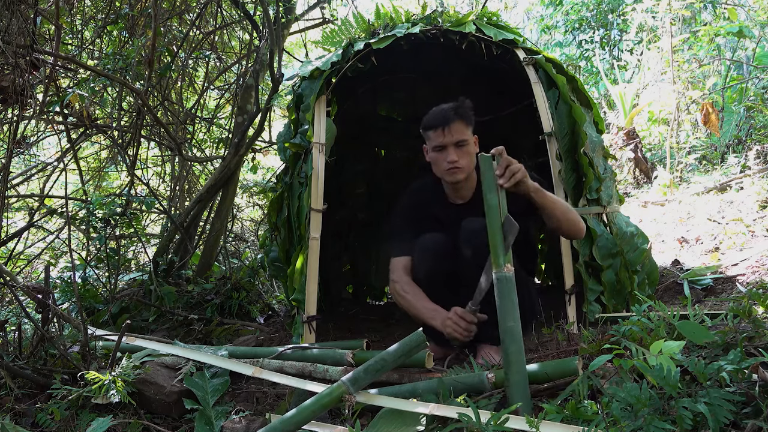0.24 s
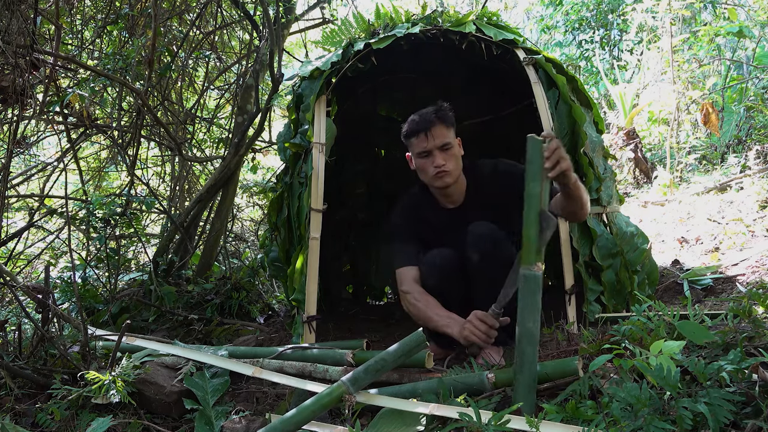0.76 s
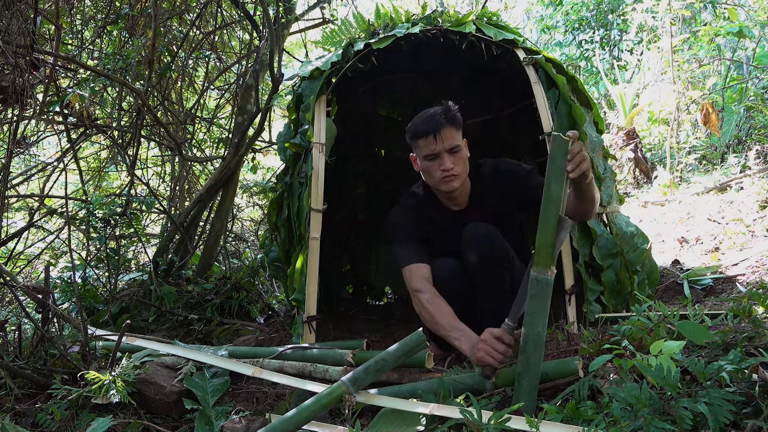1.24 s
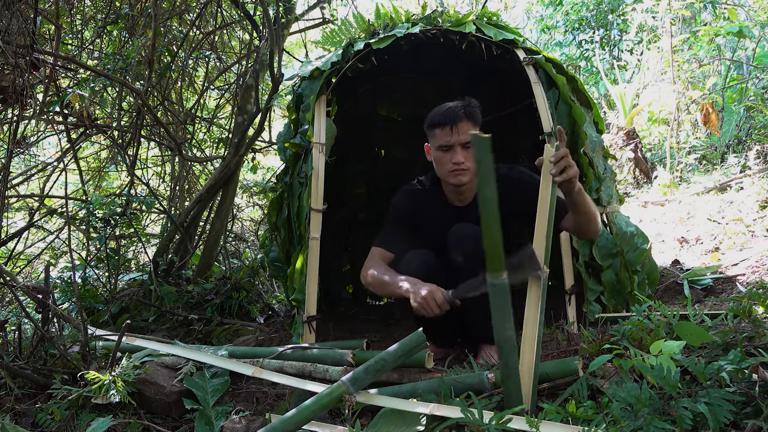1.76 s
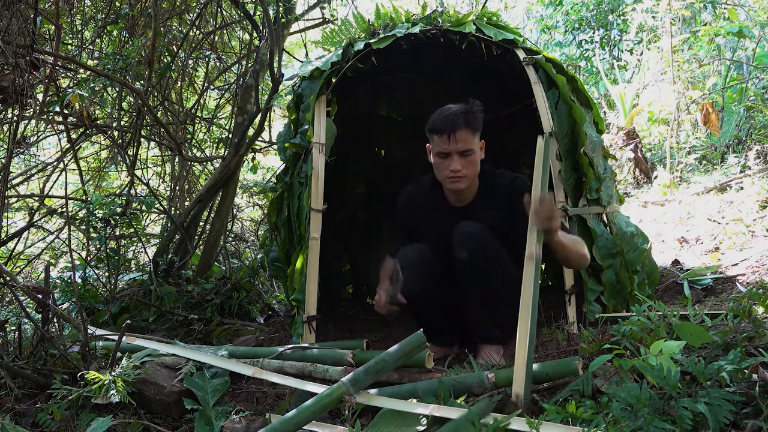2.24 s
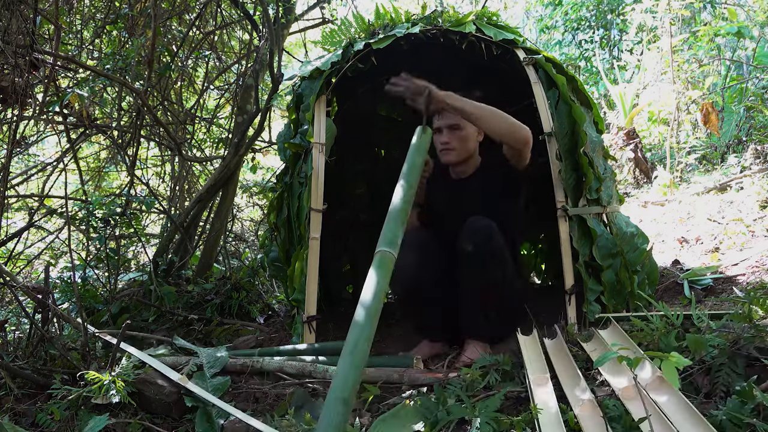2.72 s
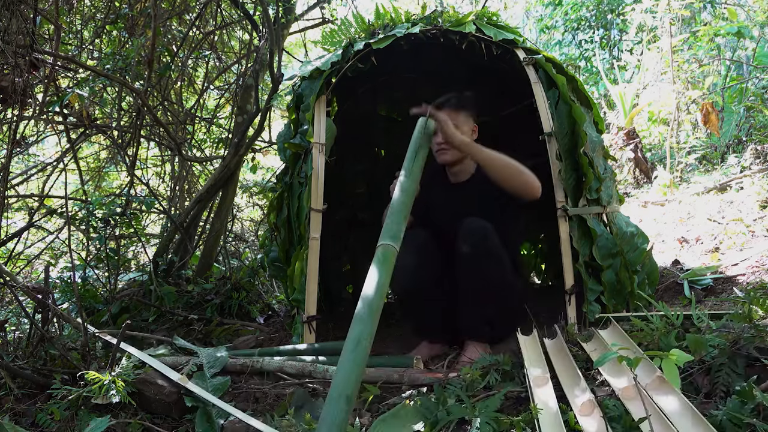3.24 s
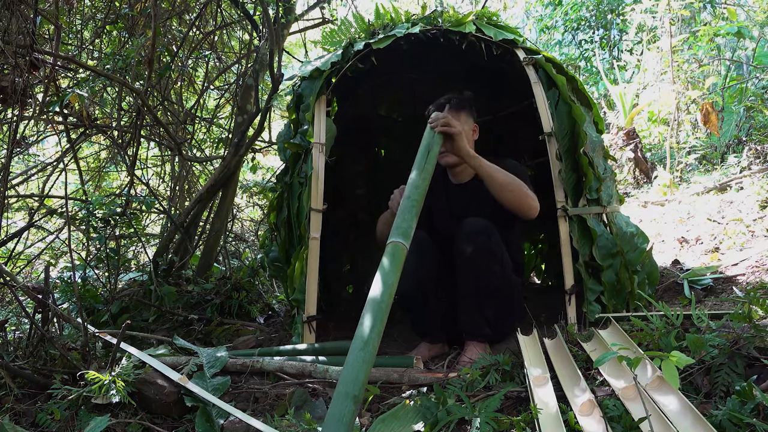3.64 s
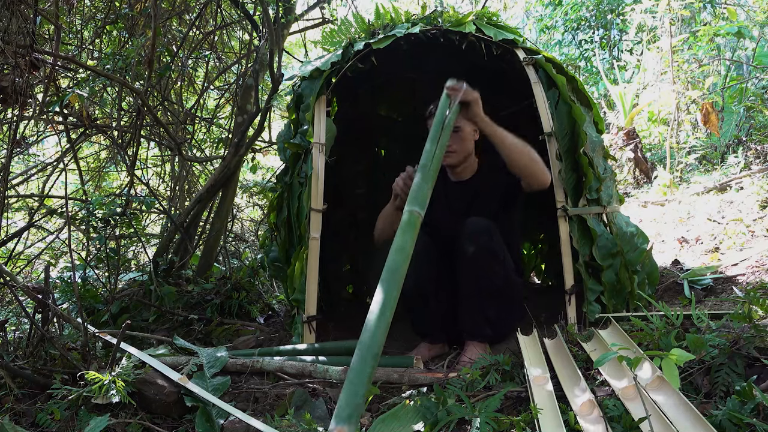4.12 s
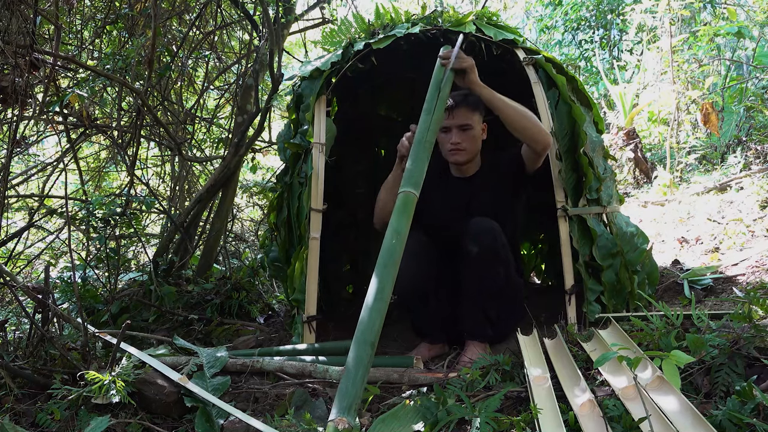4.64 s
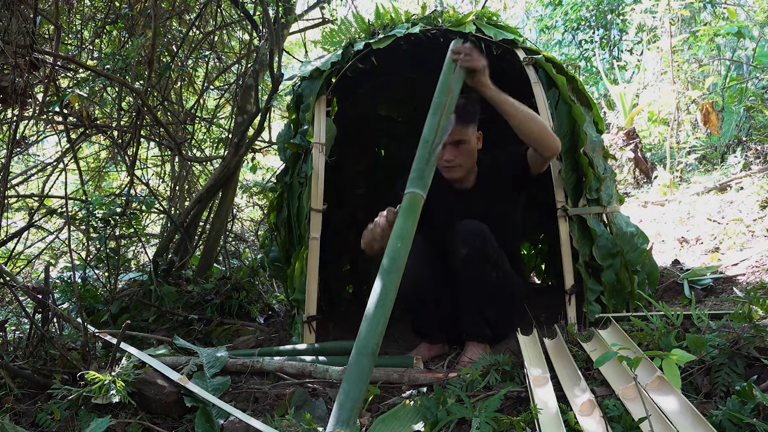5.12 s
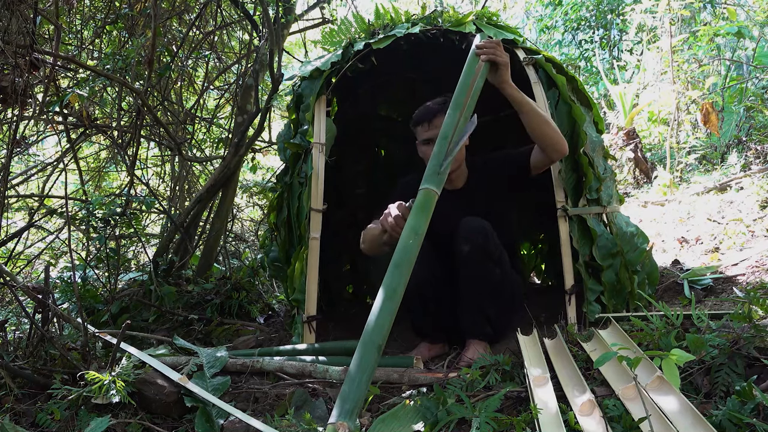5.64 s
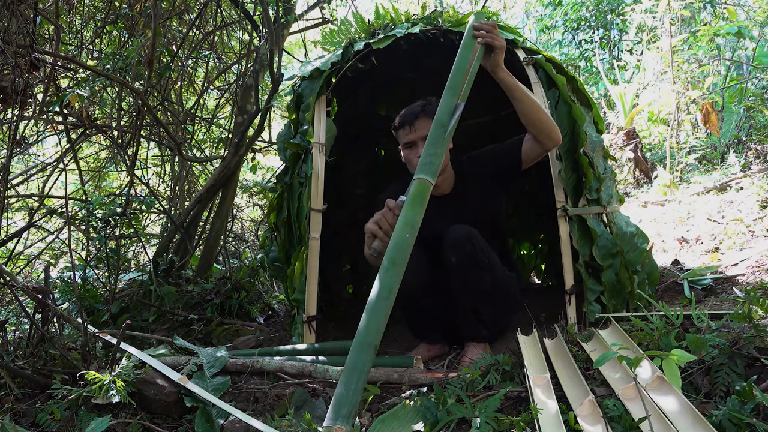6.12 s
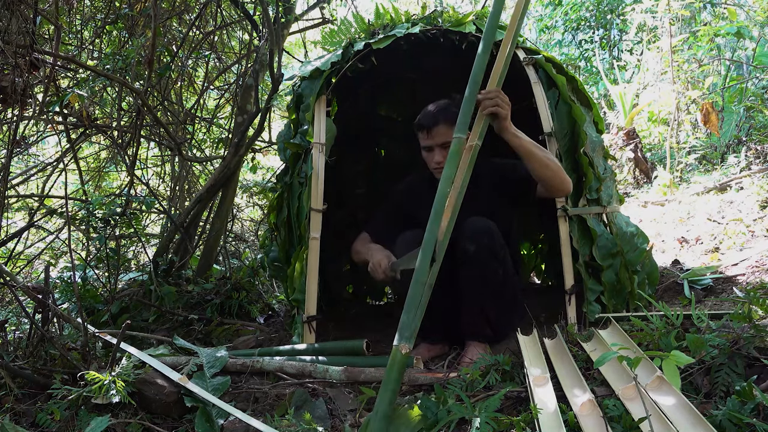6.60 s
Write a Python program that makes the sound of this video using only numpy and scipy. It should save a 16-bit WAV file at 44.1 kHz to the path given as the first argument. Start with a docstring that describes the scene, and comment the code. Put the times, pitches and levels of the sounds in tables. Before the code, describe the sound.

Outdoors among trees, a microphone a couple of metres away, the work slightly right of centre. Nasal wooden creaking leads to fast resonant cracks and rips as green bamboo splits; a half falls and rings. Bright brittle snaps cluster next, followed by quieter scrapes, a deep hollow tock, one loud crack and tiny squeaks. Grainy high insect drone, faint chirps and low distant rumble surround it.

```python
"""Splitting green bamboo in a forest

A machete is levered down two green bamboo poles in turn, two metres away: the slot creaks in pitched slips,
the split jumps ahead in hollow knocks (decaying sines plus gritty pushes that ring the pole), fibres tear in
dense clicks, and the blade squeaks in wavering sines. Two insect choruses of grainy band noise, faint chirps,
a leaf rustle and a far rumble fill the air; the loudest peaks are rounded off.
"""
import sys
import numpy as np
from scipy import signal
from scipy.io import wavfile
from scipy.ndimage import uniform_filter1d

SR = 44100
rng = np.random.default_rng(int(sys.argv[2]) if len(sys.argv) > 2 else 0)


def file_out(sig):
    """Save sig as 16-bit WAV at sys.argv[1]."""
    # one column per channel
    cols = np.atleast_2d(sig).T
    # limit, then scale
    lim = np.clip(cols, -1, 1)
    pcm = np.round(lim * 32767).astype(np.int16)
    wavfile.write(sys.argv[1], SR, pcm)


N = 302526  # samples

# the levered slot sticks and slips: start_s [s], level_db [dB, ring peak]
CREAK_SLIPS = [(0.16, -16), (0.232, -24), (0.271, -16), (0.314, -7), (0.324, -9), (0.363, -10), (0.376, -8),
               (0.403, -8.5), (0.421, -12), (0.45, -12.5), (0.493, -10), (0.558, -13.5), (0.575, -9),
               (0.589, -19), (0.6, -14.5), (0.62, -16.5), (0.666, -14)]
# rings of the levered slot: ratio [to the slip's pitch], level_db [dB], t60_s [s]
SLOT_RINGS = [(1, 0, .055), (.8, -5, .045), (.29, -14, .06), (2.47, -9, .09)]
CREAK_HZ, CREAK_SCATTER = 899, .01  # the pitch differs a little from slip to slip


def creaks():
    """Stick-slip: every slip of the levered slot rings the same hollow near one pitch."""
    pitch_hz = CREAK_HZ * (1 + CREAK_SCATTER * rng.standard_normal(len(CREAK_SLIPS)))
    slips = [(*row, hz) for row, hz in zip(CREAK_SLIPS, pitch_hz)]
    sound, _ = blows(slips, SLOT_RINGS, push_s=.0079, ring=.96, rise_s=.00072, thud_db=0)
    return sound


# the split jumps or the pole is struck: start_s [s], level_db [dB, ring peak], ring_hz [Hz]
SPLIT_KNOCKS = [(0.679, -5, 720), (0.73, -7, 794), (0.777, -6.5, 735), (0.809, -14.5, 780),
                (0.855, -11.5, 916), (0.878, -11, 1045), (0.893, -3, 695), (0.995, -5, 1002),
                (1.019, -9.5, 1415), (1.079, -5.5, 470), (1.089, -6, 1112), (1.11, -8, 1056),
                (1.197, -4.5, 1396), (1.204, -7.5, 507), (1.236, -12.5, 490), (1.29, -13, 497),
                (1.471, -10.5, 1114), (2.095, -13, 1330), (2.29, -5.5, 279), (2.475, -20, 1310),
                (2.545, -22.5, 295), (2.89, -22.5, 564), (4.094, -24.5, 560), (4.142, -25.5, 680),
                (4.196, -21, 686), (4.214, -19, 316), (4.273, -10.5, 322), (4.273, -13, 1770),
                (4.276, -12, 894), (4.385, -19.5, 700), (4.747, -13.5, 308), (4.8, -12, 728),
                (5.065, -14, 305), (5.103, -5.5, 723), (5.119, -8.5, 676), (6.142, -16, 652),
                (6.679, -9, 1040), (6.749, -22.5, 845)]
# rings of a knock or crack: ratio [to ring_hz], level_db [dB], t60_s [s]
OVERTONES = [(1, 0, .045), (2.47, -14, .045)]
KNOCK_TREBLE_DB = -10.5  # the faint snap on every knock, relative to its ring


def knocks():
    """A dull blow: slow onset, short ring and a thud; returns the sound and its bare pushes."""
    table = [(*row, KNOCK_TREBLE_DB) for row in SPLIT_KNOCKS]
    return blows(table, OVERTONES, push_s=.0055, ring=1, rise_s=.001, thud_db=-.5)


# a bundle of fibres breaks at once: start_s [s], level_db [dB, ring peak], ring_hz [Hz],
# treble_db [dB, relative to the ring]
FIBRE_CRACKS = [(1.033, -14, 1670, 13), (2.784, -10.5, 1670, 0), (2.829, -11.5, 1224, 9.5),
                (2.864, -16, 1230, 13), (3.027, -6.5, 1000, 5.5), (3.038, -14.5, 1690, 2),
                (3.056, -5.5, 603, 8.5), (3.078, -12.5, 1620, 4), (3.087, -12, 1110, 12.5),
                (3.107, -18, 980, 19), (3.12, -12, 680, 4), (3.135, -8.5, 900, 2.5),
                (3.149, -12.5, 1700, 19), (3.16, -10.5, 714, 8.5), (3.169, -10, 1500, 4),
                (3.181, -10.5, 1030, 9.5), (3.226, -15.5, 650, 16), (5.152, -13, 570, 11),
                (6.463, -11, 1380, -4), (2.281, -16, 935, 16.5)]


def cracks():
    """A bright crack: a shorter, sharper push than a knock; returns the sound and its bare pushes."""
    return blows(FIBRE_CRACKS, OVERTONES, push_s=.0023, ring=1, rise_s=.00044, thud_db=3.5)


BLUNT_TOP_HZ = 6000  # a blunt blow carries little above this


def struck_bamboo():
    """Creaks, knocks and cracks; the last two also wake the whole pole."""
    dull, dull_push = knocks()
    sharp, sharp_push = cracks()
    whole_pole = pole(undb(10) * dull_push + undb(11.5) * sharp_push)
    blunt = creaks() + dull + whole_pole + hollow(dull_push)
    return sharp + signal.sosfilt(signal.butter(2, BLUNT_TOP_HZ, fs=SR, output="sos"), blunt)


SPLINTER_HZ = (3200, 5300)  # each splinter rings somewhere in this range
SPLINTER_WIDTH_HZ, SPLINTER_DB = 300, 9


def blows(table, overtones, push_s, ring, rise_s, thud_db):
    """A short gritty push rings the hollow at its own pitch; returns the sound and the bare pushes."""
    out, pushes = np.zeros(N + SR), np.zeros(N + SR)
    t = np.arange(SR // 8) / SR
    ratio, overtone_db, t60 = np.transpose(overtones)[:, :, None]
    settle = t + .0006 * (1 - np.exp(-t / .0015))  # the ring starts sharp and drops to its pitch
    shape = np.exp(-t / push_s) * (1 - np.exp(-t / .0014))
    grits, picks = rng.standard_normal((len(table), len(t))), rng.random(len(table))
    for (start, level_db, hz, *treble_db), grit, pick in zip(table, grits, picks):
        push = grit * shape
        decay = undb(overtone_db - 60 * t / (ring * t60))
        tone = np.sum(decay * np.sin(2 * np.pi * hz * ratio * settle), 0) * (1 - np.exp(-t / rise_s))
        thud = band(push, hz * 1.2, hz * 1.4)
        sound = peak_one(tone) + undb(thud_db) * peak_one(thud)
        if treble_db:
            splinter_hz = np.interp(pick, [0, 1], SPLINTER_HZ)
            snap = bright(push) + undb(SPLINTER_DB) * band(push, splinter_hz, SPLINTER_WIDTH_HZ)
            sound = sound + undb(treble_db[0]) * peak_one(snap)
        i = int(start * SR)
        out[i:i + len(t)] += undb(level_db) * sound
        pushes[i:i + len(t)] += undb(level_db) * push
    return out[:N], pushes[:N]


# fibres rip at once and die away: start_s [s], length_s [s], level_db [dB, drive],
# strip_hz [Hz, loudest ring], treble_db [dB, relative to level_db]
FIBRE_RIPS = [(1.016, 0.065, -17, 730, 4.5), (1.076, 0.23, -14, 1080, -8.5), (1.465, 0.05, -17.5, 695, 5.5),
              (1.565, 0.11, -13, 810, 3), (2.28, 0.077, -13, 1345, -4.5), (2.403, 0.041, -20, 2160, 1.5),
              (2.52, 0.061, -24, 2270, 8.5), (2.787, 0.047, -18, 1840, 9), (2.827, 0.11, -23.5, 550, 5),
              (3.739, 0.095, -17, 1720, 9), (4.271, 0.13, -24.5, 600, -1), (4.39, 0.21, -29.5, 2150, 1),
              (6.136, 0.27, -23.5, 1760, -3), (6.371, 0.077, -26.5, 850, -8), (6.459, 0.15, -24.5, 558, 3)]
RIP_RISE_S, RIP_FALL = .003, 1.3  # onset; power of the fading ramp
# the blade scrapes along the slot, swelling and letting go: start_s [s], length_s [s],
# level_db [dB, drive], strip_hz [Hz, loudest ring], treble_db [dB, relative to level_db]
BLADE_SCRAPES = [(1.111, 0.082, -24.5, 571, -5), (1.194, 0.11, -20, 477, -1.5), (3.012, 0.2, -22.5, 408, 2),
                 (3.944, 0.32, -33.5, 1440, -10), (4.529, 0.23, -28, 1880, 3.5),
                 (5.059, .12, -14, 1320, -2.5), (5.396, 0.16, -36, 950, 7), (5.676, 0.44, -33, 1300, -0.5),
                 (6.199, 0.095, -27.5, 1900, 2)]
SCRAPE_TOP = .84  # share of the stroke spent swelling


def tears():
    """Irregular slips drive the pole and the loose strip; the treble is the bare snap of the fibres."""
    uneven = undb(1.8 * walk(130))  # stick and slip
    slips = level(clicks(1300, 2) * uneven, 0)
    snaps = level(bright(clicks(5000, .25) * uneven), 0)
    grit, out, t = np.zeros(N), np.zeros(N), np.arange(N) / SR
    strokes = [(RIP_RISE_S, RIP_FALL, *row) for row in FIBRE_RIPS]
    strokes += [(SCRAPE_TOP * row[1], 1, *row) for row in BLADE_SCRAPES]
    for rise, fall, start, length, level_db, strip_hz, treble_db in strokes:
        on = slice(int(start * SR), int((start + length + .05) * SR))
        knee = [0, rise, length]
        onset = np.interp(t[on] - start, knee, [0, 1, 1]) ** .5
        fade = np.interp(t[on] - start, knee, [1, 1, 0]) ** fall
        swell = undb(level_db) * onset * fade
        drive = swell * slips[on]
        grit[on] += drive
        strip = band(band(drive, strip_hz, .16 * strip_hz), strip_hz, .16 * strip_hz)
        strip = strip * np.sqrt(SR / strip_hz)  # make up for the narrow band
        out[on] += undb(3) * strip + undb(treble_db) * swell * snaps[on]
    return undb(12) * pole(grit) + undb(-9) * hollow(grit) + out


# the blade sings in the slot: start_s [s], length_s [s], pitch_hz [Hz], level_db [dB, roughly rms]
BLADE_SQUEAKS = [(4.45, 0.015, 1376, -21.5), (4.455, 0.028, 550, -22), (6.002, 0.062, 1695, -28.5),
                 (6.042, 0.048, 518, -33.5), (6.236, 0.029, 2956, -16), (6.252, 0.026, 564, -25),
                 (6.498, 0.03, 3200, -18), (6.505, 0.036, 687, -24.5), (6.565, 0.062, 718, -32.5),
                 (6.603, 0.04, 380, -34)]


def squeaks():
    """The blade rubbing in the slot sings in short wavering tones."""
    return wavering_tones(BLADE_SQUEAKS)


def wavering_tones(table):
    """Short sines that swell and fade while pitch and level wander."""
    out = np.zeros(N)
    waver, flutter = walk(60), walk(90)
    for start, length, hz, level_db in table:
        i, n = int(start * SR), int(length * SR)
        phase = 2 * np.pi * np.cumsum(hz * (1 + .008 * waver[i:i + n])) / SR
        swell = np.sin(np.pi * np.arange(n) / n) ** .7
        out[i:i + n] += 2 * undb(level_db + 3 * flutter[i:i + n]) * swell * np.sin(phase)
    return out


# resonances of the first pole, its dropped half and the second pole, one list each:
# ring_hz [Hz], width_hz [Hz], level_db [dB]
POLE_RINGS = ([(550, 137, 2), (810, 30, 9), (1085, 120, 5), (1344, 25, 6)], [(495, 3.2, 15), (887, 42, 7),
              (1315, 19, 14), (2080, 85, 9.5), (3350, 40, 11.5)], [(345, 230, -0.5), (657, 95, 4),
              (918, 100, 3.5), (1370, 196, 5), (1980, 520, -0.5)])
# the split half drops; it comes to rest and the second pole takes over: start_s [s]
SWAP_S = [2.2, 2.546]


def pole(x):
    """The piece that is struck rings with its own resonances."""
    piece = np.searchsorted(SWAP_S, np.arange(N) / SR)
    return np.choose(piece, [body(x, modes) for modes in POLE_RINGS])


HOLLOW = (340, 11, 29)  # Hz, width Hz, dB: the air in a joint that is still closed
HOLLOW_S = (3.9, 4.79)  # blows and rubs between these times drive it


def hollow(x):
    """Blows and rubs on the closed joint leave a long low ring."""
    t = np.arange(N) / SR
    return body(x * (t > HOLLOW_S[0]) * (t < HOLLOW_S[1]), [HOLLOW])


def bright(x):
    """The colour of snapping fibres: strongest at 2-6 kHz, falling away above."""
    crisp = band(treble(x, 740), 2930, 3200)
    return signal.sosfilt(signal.butter(2, 11000, fs=SR, output="sos"), crisp)


# insect resonances of the low and the high chorus: pitch_hz [Hz], width_hz [Hz], level_db [dB]
LOW_CHORUS = [(2740, 1300, -4.5), (3560, 1370, -3), (4160, 960, -1), (5390, 1050, 3)]
HIGH_CHORUS = [(7760, 1000, 7), (8870, 900, 6), (9860, 490, -2)]


def chorus(modes, share, grain_db):
    """Countless insects: grainy noise in their resonances, each band swelling on its own."""
    grain = undb(grain_db * walk(900))
    out = 0
    for hz, width, level_db in modes:
        insects = band(band(wide(share) * grain, hz, 1.43 * width), hz, 1.43 * width)
        out = out + undb(level_db + 1.58 * walk(6.7)) * level(insects, 0)
    return level(treble(treble(out, 2160), 2160), 0)


# faint far chirps: start_s [s], length_s [s], pitch_hz [Hz], level_db [dB, roughly rms]
FAR_CHIRPS = [(.515, 0.1, 4760, -28), (5.2, .3, 4230, -32.5), (6.33, .14, 4759, -30)]


def chirps():
    """Far chirps are short wavering tones."""
    return wavering_tones(FAR_CHIRPS)


# colour of the rustle: pitch_hz [Hz], density_db [dB per Hz, relative]
LEAF_COLOUR = [(150, 1.5), (1500, -2.5), (11000, -25), (15000, -19)]
LEAVES_DB = -40  # rms


def leaves():
    """A faint rustle: noise in half-octave steps that flicker independently."""
    colour_hz, density_db = np.transpose(LEAF_COLOUR)
    out = 0
    for hz in 150 * 2 ** np.arange(0, 6.8, .5):
        band_db = np.interp(np.log(hz), np.log(colour_hz), density_db)
        out = out + undb(band_db + 1.5 * walk(8)) * band(wide(.09), hz, hz / 3)
    return level(out, LEAVES_DB)


def far_rumble():
    """Nearly mono low noise whose level wanders, at unit rms."""
    return level(band(band(wide(.0089), 71, 29), 46, 180) * undb(3 * walk(7.9)), 0)


def among_trunks(work):
    """The work sits slightly to the right; trunks scatter a short tail, different on each side."""
    t = np.arange(SR // 4) / SR
    tail = treble(rng.standard_normal((2, len(t))), 630) * undb(-41.5 - 60 * t / .27)  # t60 0.27 s
    direct = work * undb(np.array([[-.8], [.8]]))
    return direct + signal.fftconvolve(work[None], tail, axes=1)[:, :N]


def undb(db):
    """Decibels to a linear gain."""
    return 10 ** (np.asarray(db) / 20)


def level(x, db):
    """Scale a signal of unit rms, or brought to it, to the given rms in dB."""
    return x * undb(db) / np.sqrt(np.mean(x ** 2))


def peak_one(x):
    """Scale to a peak of 1."""
    return x / np.abs(x).max()


def band(x, hz, width):
    """Two-pole resonance, gain 1 at the centre."""
    return signal.lfilter(*signal.iirpeak(hz, hz / width, fs=SR), x)


def body(x, modes):
    """A sum of resonances with alternating sign."""
    return sum((-1) ** k * undb(db) * band(x, hz, width) for k, (hz, width, db) in enumerate(modes))


def treble(x, hz):
    """Gentle high-pass."""
    return signal.sosfilt(signal.butter(2, hz, "high", fs=SR, output="sos"), x)


def walk(rate):
    """Random levels held 1 / rate seconds and smoothed twice; spread near 0.8."""
    k = int(SR / rate)
    steps = np.repeat(rng.standard_normal(N // k + 1), k)
    return 1.06 * uniform_filter1d(uniform_filter1d(steps, k), k)[:N]


def wide(share):
    """Stereo noise; share is the gain of the part that differs between the channels."""
    mid, side = rng.standard_normal((2, N))
    return mid + share * side * np.array([[1], [-1]])


def clicks(rate, spread_db):
    """Random clicks of either sign, rate per second; a wider spread makes a few far louder."""
    when, size, sign = rng.random((3, N))
    x = (when < rate / SR) * undb(-spread_db * np.log(size + 1e-9)) * np.sign(sign - .5)
    return x / x.std()


# levels of the forest over time: start_s [s], low_chorus_db [dB], high_chorus_db [dB], rumble_db [dB]
FOREST_LEVELS = [(0, -21, -29, -54), (.5, -18.5, -25.5, -56), (2.3, -18.5, -27, -51.5),
                 (2.9, -20, -29, -43), (3.5, -22.5, -30, -38), (3.9, -22.5, -29.5, -44),
                 (6.86, -20.5, -30, -37.5)]


def scene():
    """The bamboo work among the trunks, over the insects, rumble and leaves."""
    start_s, *columns = np.transpose(FOREST_LEVELS)
    t = np.arange(N) / SR
    low, high, rumble = (undb(np.interp(t, start_s, column)) for column in columns)
    work = treble(struck_bamboo() + tears() + squeaks(), 226)  # a thin pole sends out no deep bass
    insects = low * chorus(LOW_CHORUS, .24, .51) + high * chorus(HIGH_CHORUS, .69, 1.9)
    return among_trunks(work) + insects + chirps() + rumble * far_rumble() + leaves()


FULL_SCALE, TOP_HZ = .9, 15950  # ceiling of the peaks; upper band edge


def record(dry):
    """The converter rounds off the loudest peaks; the top is cut steeply."""
    rounded = dry / (1 + np.abs(dry / FULL_SCALE) ** 6) ** (1 / 6)
    return signal.sosfilt(signal.ellip(10, .2, 70, TOP_HZ, fs=SR, output="sos"), rounded)


dry = scene()
out = record(dry)
file_out(out)
```